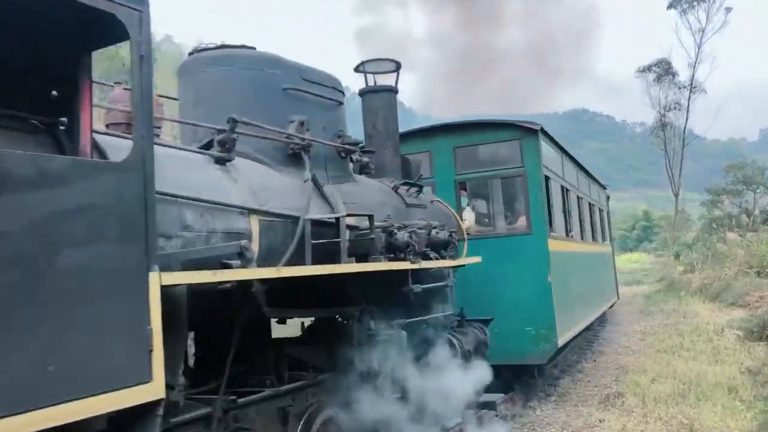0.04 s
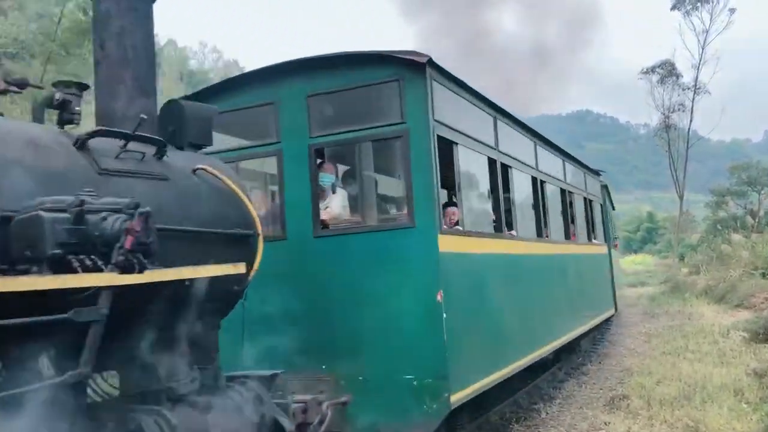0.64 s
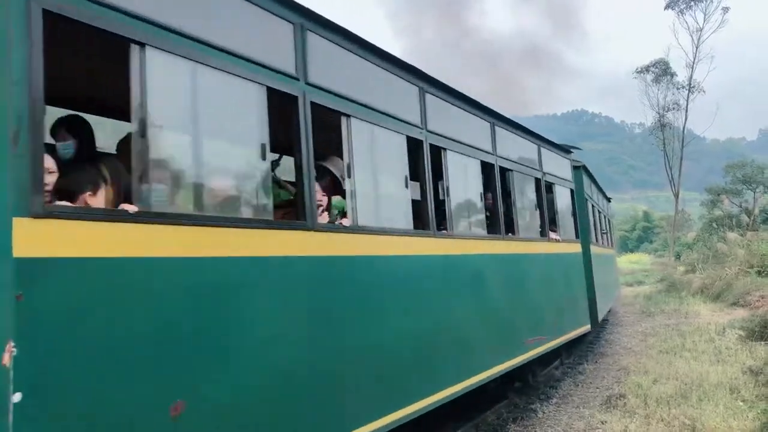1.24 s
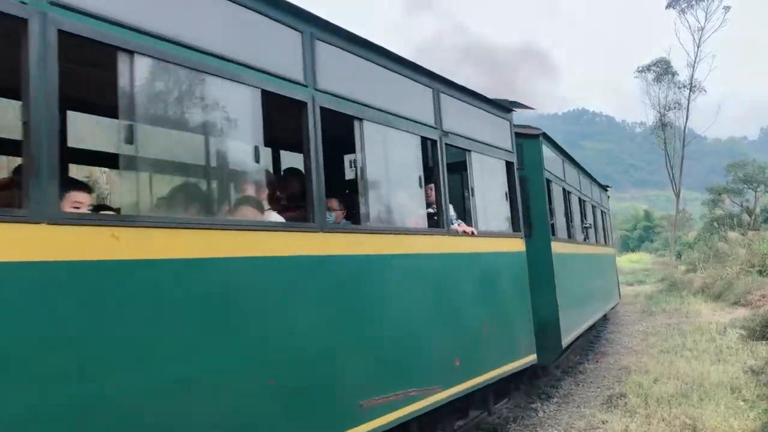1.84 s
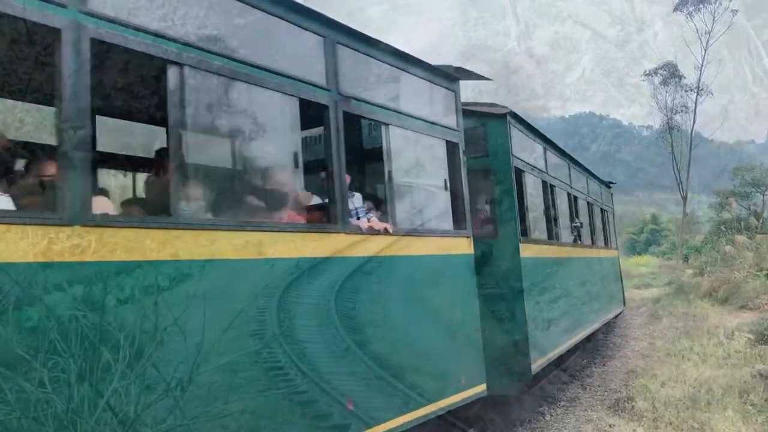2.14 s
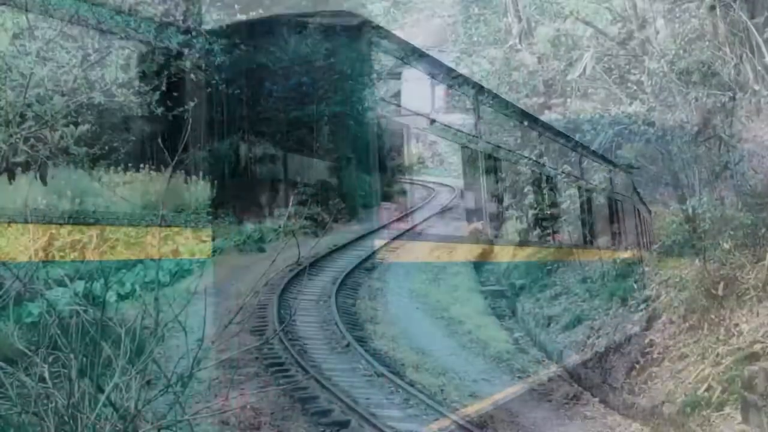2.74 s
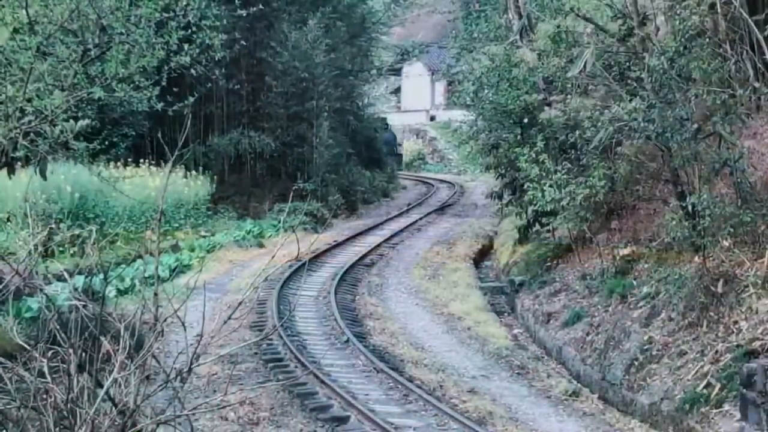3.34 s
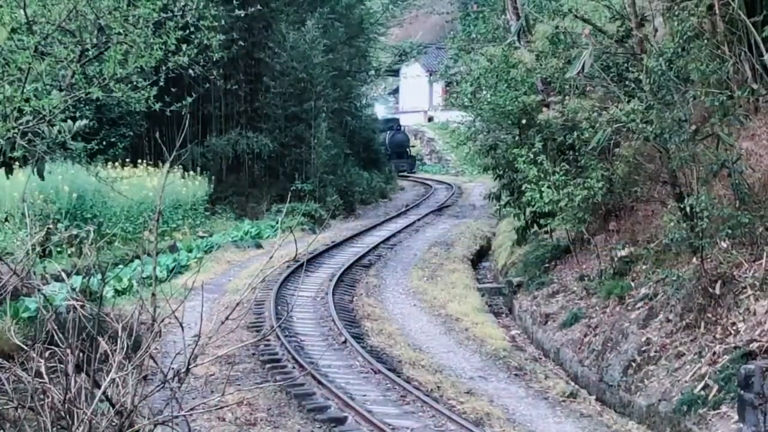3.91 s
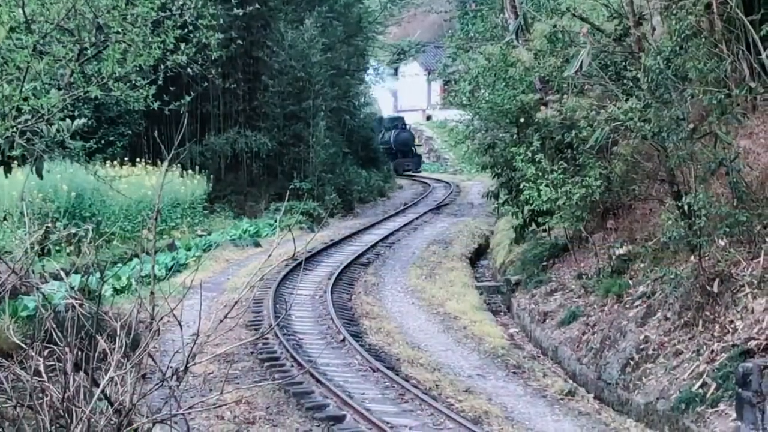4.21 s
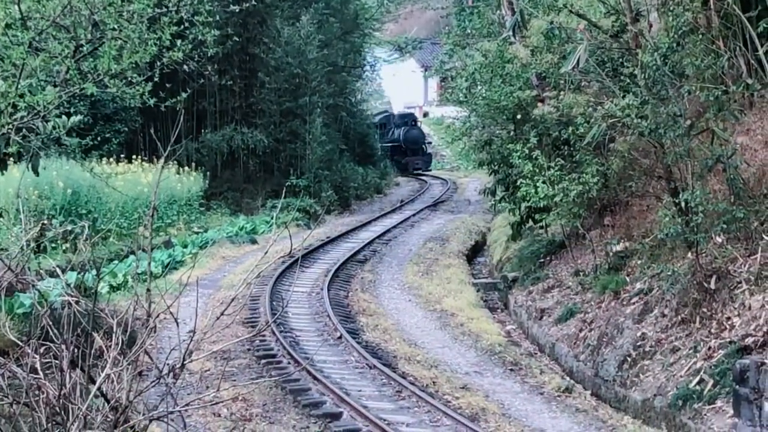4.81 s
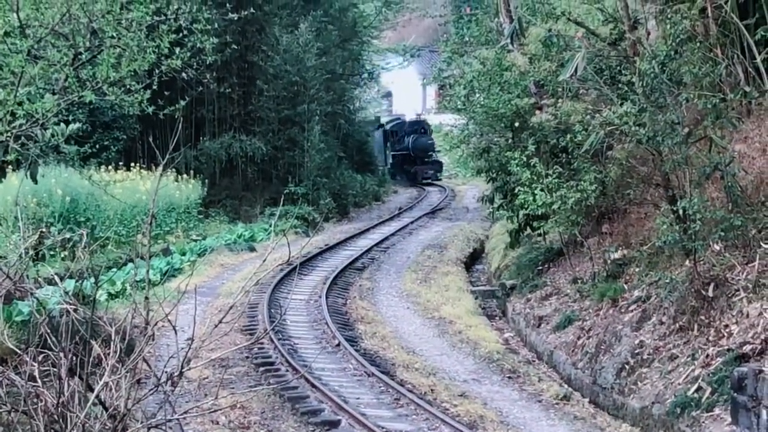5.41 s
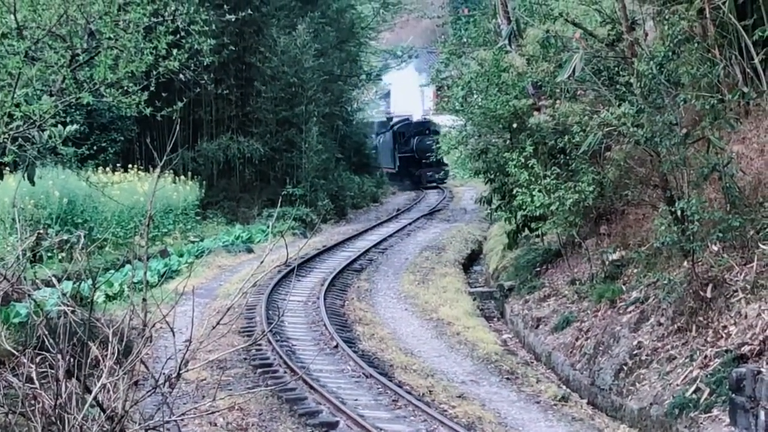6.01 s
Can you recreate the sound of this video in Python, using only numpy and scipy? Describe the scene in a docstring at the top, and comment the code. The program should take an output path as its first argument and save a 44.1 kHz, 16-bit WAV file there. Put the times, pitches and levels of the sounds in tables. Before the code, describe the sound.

A small steam engine runs past very close, with rapid booming chuffs, regular spits of hissing steam, rattling iron and thin wheel squeals over a low rumble. It eases slightly as it moves on, then cuts off abruptly to quiet countryside with faint bird chirps and soft, distant puffing. A steam whistle then blows one long, breathy, slightly wavering blast that holds to the end.

```python
"""Beside a railway line, a small steam engine runs past at arm's length. Used steam barks and booms in
its chimney eleven times a second, a leaking cylinder spits once per wheel turn, and the wheels rumble
and squeal. Then we jump to an almost quiet spot, with faint birds and the engine puffing far off.
There it blows one long, breathy blast: steam rushes over the chambers of its whistle, a note for each."""
import sys
import numpy as np
from scipy import signal
from scipy.fft import rfft, irfft, next_fast_len
from scipy.io import wavfile

SR = 44100
rng = np.random.default_rng(int(sys.argv[2]) if len(sys.argv) > 2 else 0)


def file_out(sig):
    """Save sig as 16-bit WAV at sys.argv[1]."""
    # one column per channel
    cols = np.atleast_2d(sig).T
    # limit, then scale
    lim = np.clip(cols, -1, 1)
    pcm = np.round(lim * 32767).astype(np.int16)
    wavfile.write(sys.argv[1], SR, pcm)


N = 267246
TIME = np.arange(N) / SR

SCENE_CHANGE_S, WHISTLE_START_S = 2.674, 4.146
BOOM_HZ, BOOM_SCATTER_HZ, BOOM_HALF_S = 234.7, 15, .019  # the chimney's usual boom
SAG_HZ_PER_DB = .4  # the low whistle note sinks as it breaks

# how strong each noise is, from low to high (its "colour"): pitch_hz, level_db
COUNTRY_COLOUR = [(15, -67), (25, -57), (68, -10.5), (97, -5.5), (206, -12), (236, -14.5), (293, -14.5),
                  (335, -20), (607, -30.5), (796, -25), (2220, -30), (4030, -36.5), (12900, -51.5),
                  (16000, -60)]
RUMBLE_COLOUR = [(40, -14), (60, -4), (80, 2), (140, -1), (230, 11), (330, -1), (480, -2), (650, -11.5),
                 (1200, -17.5), (2000, -19), (4000, -21), (6000, -24), (9000, -28.5), (16000, -31.5)]
LEAK_JET_COLOUR = [(2500, -12.5), (3500, -4.5), (4900, -2.5), (6000, 0.5), (7500, 1), (10000, -1.5),
                   (16000, -6.5)]
LEAK_RUSH_COLOUR = [(150, -18.5), (400, -2), (650, 1), (1100, 0.5), (1600, 0.5), (2600, 3.5), (3200, -1),
                    (4200, 0), (7000, -15.5)]
BARK_COLOUR = [(70, -14.5), (130, -3), (200, 7), (310, -2), (390, 0), (560, -5.5), (650, -9.5), (900, -8),
               (1300, -10), (1700, -12), (2600, -20.5), (4000, -28.5), (9000, -48)]
HISS_COLOUR = [(900, -13), (2000, 7), (3500, 1), (5000, 0.5), (7500, -1), (11000, -3), (16000, -5)]
WHISTLE_STEAM_COLOUR = [(200, -5), (450, -7.5), (700, 4), (850, 11), (1050, -0.5), (1900, 4), (2500, 3.5),
                        (2950, 0), (3500, 2.5), (5000, -2), (7500, -5), (9700, -11.5), (11500, -11),
                        (16000, -26)]
FAR_PUFF_COLOUR = [(1500, -13), (3000, -6), (4000, 6.5), (5500, -1), (7500, -4.5), (9500, -15),
                   (11000, -10), (15000, -28)]
# pitches that each hollow space makes louder: pitch_hz, width_hz, boost_db
SMOKEBOX_PEAKS = [(357, 88, 1), (718, 67, 0.5), (1187, 50, 3.5), (1392, 79, 9)]
CYLINDER_PEAKS = [(1480, 92, 15), (2300, 45, 3), (4560, 110, 6), (5180, 190, 8.3), (7640, 300, 3.4)]
WHISTLE_PEAKS = [(656, 5.4, 31), (770, 65, 10.5), (1255, 78, 6.6), (1880, 78, 13.4), (2120, 68, 5.3),
                 (2360, 89, 7), (2600, 50, 5.9), (3500, 76, 3.4), (3910, 32, 7.5), (4700, 120, 3.1)]
# puffs of the far engine and spits of the leak: time_s, level_db, rise_s, decay_s
FAR_PUFFS = [(2.84, -65, 0.031, .08), (3.12, -62, 0.024, 0.078), (3.44, -60.5, 0.024, 0.1),
             (3.73, -60, 0.044, 0.12), (4.03, -61, 0.035, 0.17)]
LEAK_SPITS = [(0.028, -14.5, 0.017, 0.084), (.374, -15, 0.0073, .1), (0.728, -18, 0.0056, 0.12),
              (1.103, -15.5, 0.011, 0.058), (1.473, -15.5, 0.012, 0.038), (1.844, -18.5, 0.015, 0.034),
              (2.22, -22, 0.017, 0.045), (2.591, -19.5, 0.015, 0.033)]
# short notes of birds and wheel rims: time_s, half_length_s, pitch_hz, slide_hz_per_s, level_db
BIRD_CHIRPS = [(3.05, .055, 3930, 5000.5, -73), (3.43, 0.016, 4090, 0, -63.5),
               (3.51, .025, 2870, 2702, -72), (3.66, 0.064, 3190, -1000, -73),
               (3.865, .03, 3160, -12000, -76.5), (3.98, 0.023, 2820, -400, -68.5)]
WHEEL_SQUEALS = [(.265, 0.03, 2840, -700, -35.5), (2.385, 0.04, 6790, -2, -41.5),
                 (2.467, .024, 6870, 299, -39), (2.505, .022, 7230, 2000, -39),
                 (2.505, .02, 7740, 2500, -48), (2.57, .015, 7200, 3000, -43),
                 (2.571, .02, 7900, 6003, -41.5)]
# moments when a wheel rings out: time_s, level_db
WHEEL_RINGS = [(.01, -35), (.985, -31), (1.55, -41), (2.04, -37), (2.45, -53)]
# notes of the shaken iron parts: pitch_hz, level_db, ring_s (time to fade by 60 dB)
IRON_NOTES = [(397, -8.5, 0.019), (483, -11.5, 0.06), (553, -9, 0.038), (725, -12, 0.044),
              (821.7, -14.5, 0.066), (1303, -11, 0.065), (1520, -23, 0.1), (2750, -28, 0.21)]
# turns of the driving wheels: start_s, beat_gap_s, bark_db, hiss_db, rise_s, decay_s
WHEEL_TURNS = [(.038, 0.093, -17, -19.5, 0.025, .034), (.392, 0.09, -17, -19.5, 0.019, 0.036),
               (.740, .0982, -18, -23.5, 0.023, .024), (1.110, 0.095, -16.3, -23.5, 0.02, 0.021),
               (1.462, 0.099, -20.5, -27.5, .012, .027), (1.837, 0.0983, -24, -33.5, 0.019, 0.031),
               (2.204, 0.1008, -21.5, -34.5, 0.016, 0.031), (2.572, 0.088, -25.5, -38, 0.016, .026)]
# a turn's four beats, the first weakened by the leak: bark_change_db, hiss_change_db, boom_db, boom_lag_s
TURN_BEATS = [(-17, -15.5, -21.5, .045), (2.03, -1, -25, .008), (0.05, 0.5, -21, .012),
              (-0.74, -5.5, -22, 0.015)]
# chimney booms that stand out: time_s, pitch_hz, level_db, half_length_s
LOUD_BOOMS = [(0.337, 241, -15, 0.026), (.45, 240, -14, 0.019), (.615, 240, -13, 0.02),
              (.682, 233.5, -12.5, 0.02), (.848, 223, -15.5, 0.013), (0.966, 242, -15.5, 0.02),
              (1.029, 217, -11.5, 0.011), (1.192, 196, -15.5, .009), (1.32, 206.4, -19, 0.028),
              (1.667, 235, -20, 0.029), (1.752, 217, -12, 0.0087), (1.919, 227, -13.5, 0.012),
              (2.147, 231.3, -18, 0.039), (2.296, 267, -14.5, 0.016), (2.506, 240, -15, 0.013)]
# the whistle's main note: time_s, pitch_hz, level_db, octave_db, upper_overtones_db
MAIN_NOTE = [(4.19, 770, -24.5, -39.5, -47.5), (4.36, 767.4, -22.9, -41.5, -46.5),
             (4.52, 775.5, -22.3, -38.5, -43.5), (4.72, 777.5, -21.5, -35, -39.0),
             (5.0, 783.4, -22.1, -36.8, -39), (5.17, 774.3, -24, -34.5, -38.5),
             (5.43, 795, -26.4, -35.5, -39), (5.53, 789.8, -26.4, -40.5, -40.5),
             (5.7, 783, -26.9, -46.0, -41.5), (5.83, 780.6, -26.2, -37.5, -39),
             (6.01, 785, -26, -43, -42.5)]
# overtones, the fainter tones above the main and low notes: pitch_multiple, level_db
MAIN_OVERTONES = [(3, -0.5), (4, -10.5), (5, -19), (6, -25), (7, -20.5)]
LOW_OVERTONES = [(2, 0.5), (3, -15), (4, -11.5)]
# the tone two octaves above the main note flares up: time_s, half_length_s, boost_db
FLARES = [(4.228, 0.11, 10), (4.46, 0.054, 7), (4.75, .08, 2.5), (5.17, 0.039, 8), (5.524, 0.032, 7),
          (5.81, 0.092, 8.5)]
# the low note wanders: time_s, pitch_hz
LOW_PITCH = [(4.19, 656), (4.5, 659), (4.72, 666), (4.92, 660), (5.11, 655.6), (5.22, 658.5), (5.52, 665.4),
             (5.7, 663.1), (6.01, 669)]
# the low note breaks for a moment: time_s, half_length_s, depth_db
LOW_BREAKS = [(4.89, 0.061, 24), (5.176, .07, 14)]
# echoes off the banks beside the line: delay_s, gain
BANK_ECHOES = [(.0047, 0.077), (0.012, 0.14), (0.0249, .2), (.0419, 0.43)]


def from_db(db):
    """Turn decibels into a number to multiply by."""
    return 10 ** (np.asarray(db) / 20)


def rms_one(x):
    """Scale a signal so its average strength (rms) is 1."""
    return x / np.sqrt(np.mean(x ** 2) + 1e-20)


def in_time(rows):
    """Join a table's points with straight lines: one curve for each column after the time."""
    times, *columns = np.transpose(rows)
    return [np.interp(TIME, times, column) for column in columns]


def ramp(start_s, length_s):
    """Climb from 0 to 1, then stay there."""
    return np.clip((TIME - start_s) / length_s, 0, 1)


def swell(time_s, half_s, level_db):
    """A smooth rise and fall around one moment."""
    return from_db(level_db) * np.exp(-np.minimum(((TIME - time_s) / half_s) ** 2, 20))


def drift(rate):
    """A smooth random wobble of size about 1 that changes about rate times a second."""
    step, warm_up = 40, 2000
    pole = np.exp(-2 * np.pi * step * rate / SR)
    draws = rng.standard_normal(N // step + warm_up + 2)
    slow = signal.lfilter([1], [1, -2 * pole, pole * pole], draws)[warm_up:]
    return np.interp(np.arange(N) / step, np.arange(len(slow)), rms_one(slow))


def noise(colour, peaks=()):
    """The rush of swirling gas, with a broad colour and narrow peaks on top."""
    size = next_fast_len(N)
    hz = np.maximum(np.fft.rfftfreq(size, 1 / SR), 1)
    points_hz, points_db = np.transpose(colour)
    gain = from_db(np.interp(np.log(hz), np.log(points_hz), points_db))
    gain *= np.minimum(hz / points_hz[0], 1) ** 2
    for centre, width, boost_db in peaks:
        gain *= 1 + (from_db(boost_db) - 1) / (1 + (2 * (hz - centre) / width) ** 2)
    return rms_one(irfft(rfft(rng.standard_normal(size)) * gain, size)[:N])


def puffs(rows):
    """Loudness over time as a valve opens: the flow swells, then the pressure runs out."""
    power = np.zeros(N)
    for time_s, level_db, rise, decay in rows:
        near = slice(max(int((time_s - 3 * rise) * SR), 0), int((time_s + 6 * decay) * SR))
        age = TIME[near] - time_s
        shape = np.exp(-np.where(age < 0, (age / rise) ** 2, age / decay))
        power[near] += (from_db(level_db) * shape) ** 2
    return np.sqrt(power)


def phase_of(hz, jitter, rate):
    """How far a wave has turned (its phase) while its pitch trembles."""
    return 2 * np.pi * np.cumsum(hz * (1 + jitter * drift(rate))) / SR


def tone(phase, level_db, flutter_db, rate):
    """A pure tone that flutters in loudness."""
    return np.sqrt(2) * np.sin(phase) * from_db(level_db + flutter_db * drift(rate))


def glide(note, jitter, flutter_db):
    """The phase and loudness of one short, shaky, sliding note."""
    time_s, half_s, hz, hz_per_s, level_db = note
    pitch = hz + hz_per_s * np.clip(TIME - time_s, -2 * half_s, 2 * half_s)
    phase = phase_of(pitch, jitter, rate=154)
    return phase, np.sqrt(2) * swell(time_s, half_s, level_db) * from_db(flutter_db * drift(80))


def echoed(x, echoes):
    """The sound plus delayed copies of itself."""
    return x + sum(gain * np.interp(TIME - delay, TIME, x, left=0) for delay, gain in echoes)


def beats():
    """Four beats to each wheel turn: time_s, bark_db, hiss_db, rise_s, decay_s, boom_time_s, boom_db."""
    rows = []
    for start, gap, bark_db, hiss_db, rise, decay in WHEEL_TURNS:
        for k, (bark_change, hiss_change, boom_db, boom_lag) in enumerate(TURN_BEATS):
            time_s = start + k * gap
            rows.append((time_s, bark_db + bark_change, hiss_db + hiss_change, rise, decay,
                         time_s + boom_lag, boom_db))
    return np.array(rows)


def countryside(level_db):
    """A low outdoor murmur."""
    return from_db(level_db + drift(5.3)) * noise(COUNTRY_COLOUR)


def birds(gain_db):
    """A bird chirps far off in the trees."""
    notes = [glide(note, jitter=0.00394, flutter_db=3.0) for note in BIRD_CHIRPS]
    return from_db(gain_db) * sum(loudness * np.sin(phase) for phase, loudness in notes)


def far_engine(gain_db):
    """Soft puffs of steam from far down the line."""
    return from_db(gain_db) * puffs(FAR_PUFFS) * noise(FAR_PUFF_COLOUR)


def rumble(level_db, fade_db_per_s, surge_db, surge_lag_s):
    """Wheels rumble and the draught roars, surging with each beat and fading as the engine leaves."""
    surge_times = beats()[:, 0] + surge_lag_s
    surge = np.cos(2 * np.pi * np.interp(TIME, surge_times, np.arange(len(surge_times))))
    roar = noise(RUMBLE_COLOUR, SMOKEBOX_PEAKS)
    return roar * from_db(level_db - fade_db_per_s * TIME + surge_db * surge + 1.2 * drift(7))


def wheel_ring(pitch_hz, steady_db, half_s):
    """A rolling wheel rings thinly, swelling now and then."""
    swells = sum(swell(time_s, half_s, level_db) for time_s, level_db in WHEEL_RINGS)
    phase = phase_of(pitch_hz, jitter=0.0056, rate=50)
    return (from_db(steady_db) + swells) * tone(phase, 0, flutter_db=1.5, rate=26)


def wheel_squeal(octave_db):
    """Wheel rims rub the rail on the curve in thin, shaky squeals."""
    notes = [glide(note, jitter=0.006, flutter_db=5.0) for note in WHEEL_SQUEALS]
    return sum(loudness * (np.sin(phase) + from_db(octave_db) * np.sin(2 * phase))
               for phase, loudness in notes)


def ironwork(gain_db, uneven_db):
    """Every blast shakes the rods and casing, bringing out a different mix of their notes."""
    out = np.zeros(N)
    blasts = beats()[:, [0, 1, 3, 4]]
    accents_db = uneven_db * np.clip(rng.standard_normal((len(blasts), len(IRON_NOTES))), -2, 1.5)
    for k, (hz, level_db, ring_s) in enumerate(IRON_NOTES):
        shaking = puffs(blasts + np.outer(accents_db[:, k], [0, 1, 0, 0])) * rng.standard_normal(N)
        # a filter that rings at one pitch
        pole, angle = np.exp(-np.log(1000) / (ring_s * SR)), 2 * np.pi * hz / SR
        drive = np.sin(angle) * np.sqrt(2 * (1 - pole * pole))
        ringing = signal.lfilter([0, drive], [1, -2 * pole * np.cos(angle), pole * pole], shaking)
        out += from_db(level_db + gain_db) * ringing
    return out


def trackside(steam, ground_gain, flank_gain, dulling):
    """Steam noise bounces off the ground and the engine's moving side, and dulls as the engine leaves."""
    heard = echoed(steam, [(.0025, ground_gain), (.0038 + 0.00018 * drift(2.3), flank_gain)])
    treble = signal.sosfilt(signal.butter(1, 9000, "high", fs=SR, output="sos"), heard)
    return heard - dulling * ramp(0.92, 1.9) * treble


def chimney(gain_db, octave_db, drone_db):
    """The gas in the chimney hums faintly and booms after each push, at times much louder."""
    loud_times = np.array(LOUD_BOOMS)[:, 0]
    usual = [(time_s, BOOM_HZ + BOOM_SCATTER_HZ * rng.standard_normal(), level_db, BOOM_HALF_S)
             for time_s, level_db in beats()[:, 5:] if np.abs(loud_times - time_s).min() > .028]
    booms = np.zeros(N)
    for time_s, hz, level_db, half_s in list(LOUD_BOOMS) + usual:
        near = np.abs(TIME - time_s) < 3 * half_s
        age = TIME[near] - time_s
        phase = 2 * np.pi * (hz * age + rng.random())
        wave = np.sin(phase) + from_db(octave_db) * np.sin(2 * phase)
        booms[near] += from_db(level_db) * np.exp(-(age / half_s) ** 2) * wave
    drone = tone(phase_of(BOOM_HZ, jitter=.04, rate=8), drone_db, flutter_db=3.5, rate=4.8)
    return np.sqrt(2) * booms * from_db(gain_db + 0.77 * drift(60)) + drone


def cylinder_leak(jet_db, rush_db, sputter_db, round_trip_s, slowing_per_s, echo_gain):
    """Once per wheel turn a gap opens: a thin, bright jet comes first, then a fuller rush."""
    spits = np.array(LEAK_SPITS)
    rushes = spits * [1, 1, 1, 0.72] + [0.0091, 0, 0.001, 0]  # later, slower to rise, quicker to fade
    jet = from_db(jet_db) * puffs(spits) * noise(LEAK_JET_COLOUR, CYLINDER_PEAKS)
    rush = from_db(rush_db) * puffs(rushes) * noise(LEAK_RUSH_COLOUR, CYLINDER_PEAKS)
    # the steam cools as it spreads, so the echo inside its passage slows during each spit
    open_times = spits[:, 0] - 2 * spits[:, 2]
    age = TIME - open_times[np.maximum(np.searchsorted(open_times, TIME) - 1, 0)]
    passage = [(round_trip_s * (1 + slowing_per_s * age), echo_gain)]
    return echoed(jet + rush, passage) * from_db(sputter_db * drift(70))


def exhaust(bark_db, hiss_db, ragged_db):
    """Each beat is a ragged blast: the nozzle hisses, then the smokebox under the chimney barks."""
    barks = beats()[:, [0, 1, 3, 4]]
    hisses = beats()[:, [0, 2, 3, 4]] * [1, 1, 1, 0.92] - [0.002, 0, 0, 0]  # a bit shorter and earlier
    bark = from_db(bark_db) * puffs(barks) * noise(BARK_COLOUR, SMOKEBOX_PEAKS)
    hiss = from_db(hiss_db) * puffs(hisses) * noise(HISS_COLOUR)
    return (bark + hiss) * from_db(ragged_db * drift(66))


def whistle(main_db, overtone_db, low_db, sum_tone_db, deep_db, steam_db):
    """One chamber sings clearly, two lower ones waver beside it, and steam rushes over their lips."""
    hz, level_db, octave_db, upper_db = in_time(MAIN_NOTE)
    low_hz, = in_time(LOW_PITCH)
    break_db = sum(depth_db * swell(time_s, half_s, 0) for time_s, half_s, depth_db in LOW_BREAKS)
    flare_db = sum(boost_db * swell(time_s, half_s, 0) for time_s, half_s, boost_db in FLARES)
    main = phase_of(hz, jitter=.0011, rate=25)
    low = phase_of(low_hz - SAG_HZ_PER_DB * break_db, jitter=.0035, rate=30)
    deep = phase_of(.6 * hz, jitter=.006, rate=15)
    notes = tone(main, level_db + main_db, flutter_db=0.3, rate=23)
    notes += tone(2 * main, octave_db + overtone_db, flutter_db=1.65, rate=11)
    for multiple, share_db in MAIN_OVERTONES:
        strength_db = upper_db + share_db + overtone_db + (flare_db if multiple == 4 else 0)
        notes += tone(multiple * main, strength_db, flutter_db=1.1, rate=9.9)
    notes += tone(low, low_db - break_db, flutter_db=0.6, rate=13)
    for multiple, share_db in LOW_OVERTONES:
        notes += tone(multiple * low, low_db + share_db, flutter_db=1.8, rate=14)
    # the chambers share one jet, which makes an extra tone at two of their pitches added together
    notes += tone(main + low, upper_db + sum_tone_db, flutter_db=2.0, rate=19)
    notes += tone(deep, deep_db, flutter_db=1.0, rate=21)
    # the first gush of steam chirps a little high
    notes += puffs([(4.153, -28, 0.0057, 0.019)]) * np.sin(phase_of(838, jitter=0.0212, rate=56))
    steam = echoed(noise(WHISTLE_STEAM_COLOUR, WHISTLE_PEAKS), BANK_ECHOES)
    steam *= from_db(steam_db + .5 * drift(29))
    return notes * ramp(WHISTLE_START_S, 0.0081) + steam * ramp(WHISTLE_START_S, 0.025)


def scene():
    """The passing engine, then the quiet spot and the whistle."""
    steam = (exhaust(bark_db=-0.1, hiss_db=2.0, ragged_db=1.67)
             + cylinder_leak(jet_db=-0.5, rush_db=-2.5, sputter_db=2.0,
                             round_trip_s=0.000985, slowing_per_s=0.85, echo_gain=.27))
    passing = (trackside(steam, ground_gain=0.14, flank_gain=0.16, dulling=0.7)
               + chimney(gain_db=-0.1, octave_db=-15.5, drone_db=-31.5)
               + ironwork(gain_db=-0.2, uneven_db=2.5)
               + rumble(level_db=-24.5, fade_db_per_s=1.5, surge_db=1.0, surge_lag_s=.012)
               + wheel_ring(pitch_hz=1196, steady_db=-49, half_s=.05)
               + wheel_squeal(octave_db=-8.5))
    far = (countryside(level_db=-56.5) + far_engine(gain_db=-3.5) + birds(gain_db=-2.0)
           + whistle(main_db=0.2, overtone_db=-0.54, low_db=-43.0, sum_tone_db=-9.0,
                     deep_db=-59.0, steam_db=-37.5))
    change = ramp(SCENE_CHANGE_S, 0.001)
    return (passing * (1 - change) + far * change)[None]


def record(dry):
    """Round off the loudest peaks and cut away the very highest treble."""
    ceiling, cutoff_hz = .72, 15900
    rounded = dry / (1 + (dry / ceiling) ** 6) ** (1 / 6)
    return signal.sosfilt(signal.ellip(12, .1, 80, cutoff_hz, fs=SR, output="sos"), rounded)


dry = scene()
out = record(dry)
file_out(out)
```